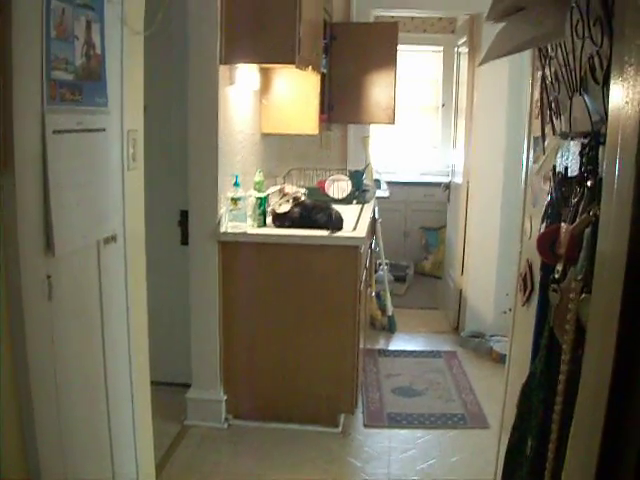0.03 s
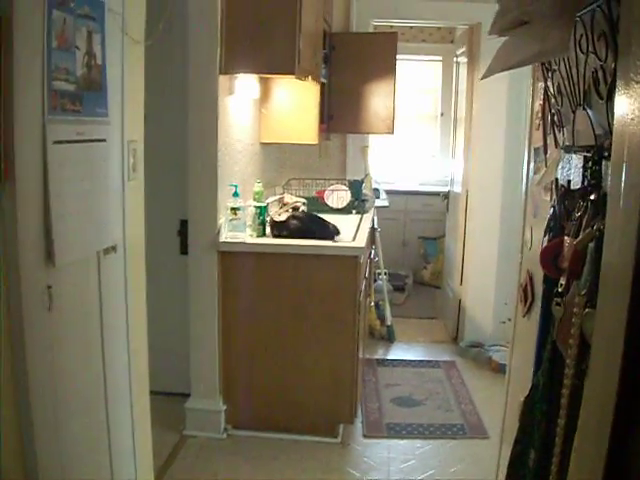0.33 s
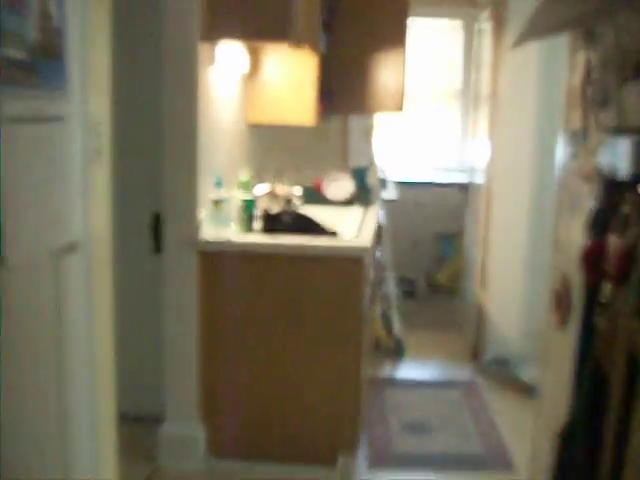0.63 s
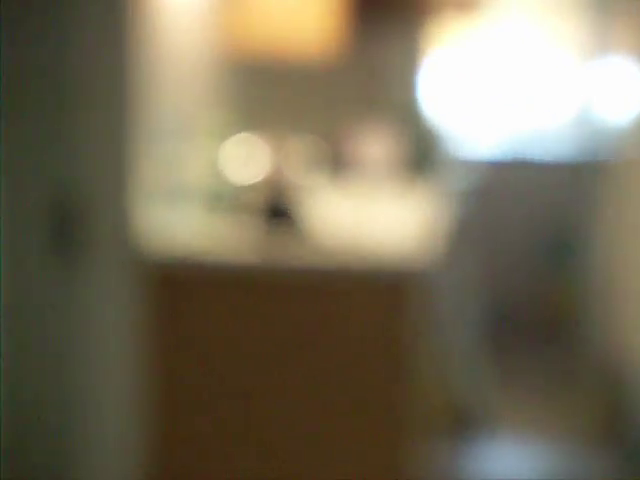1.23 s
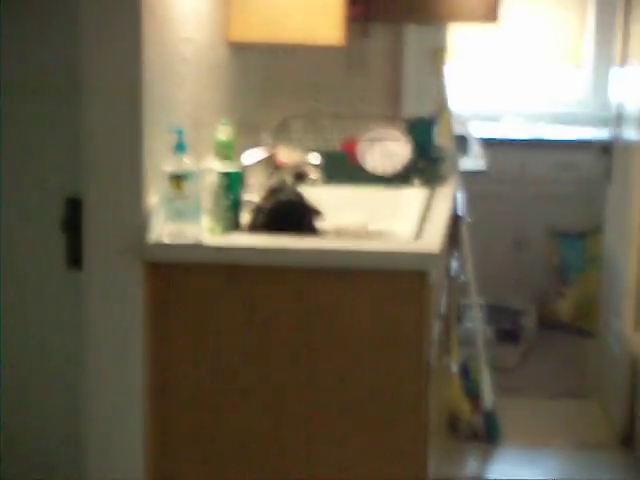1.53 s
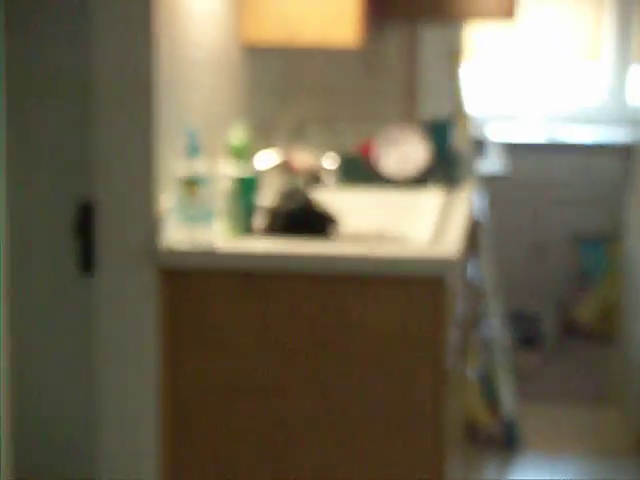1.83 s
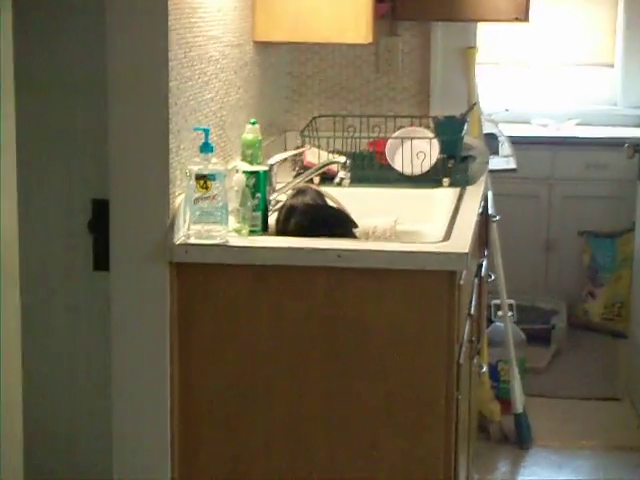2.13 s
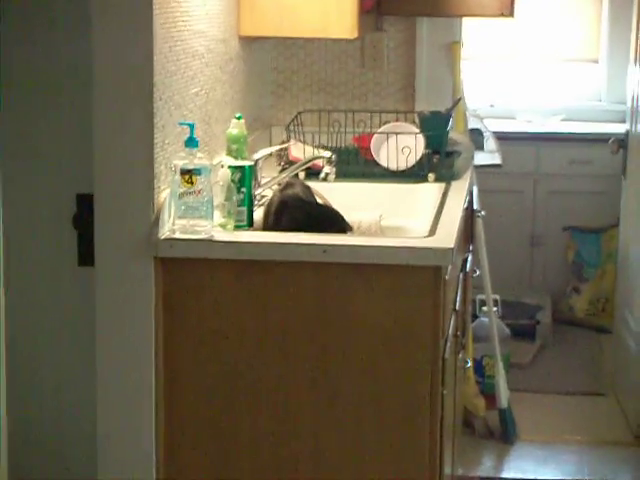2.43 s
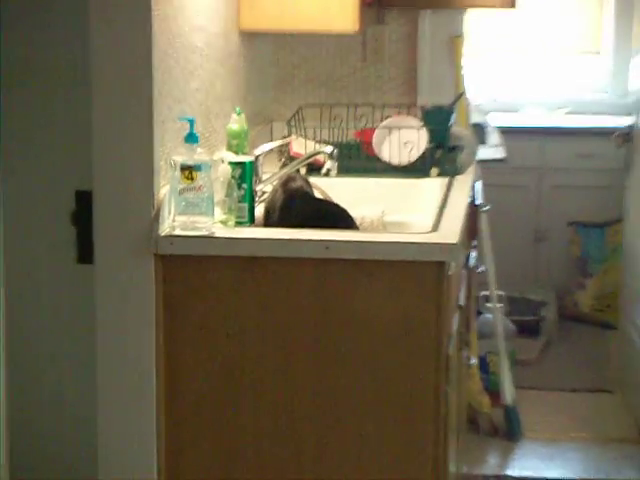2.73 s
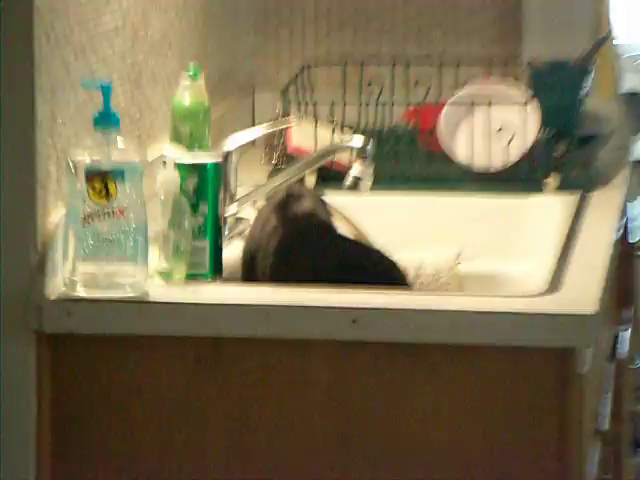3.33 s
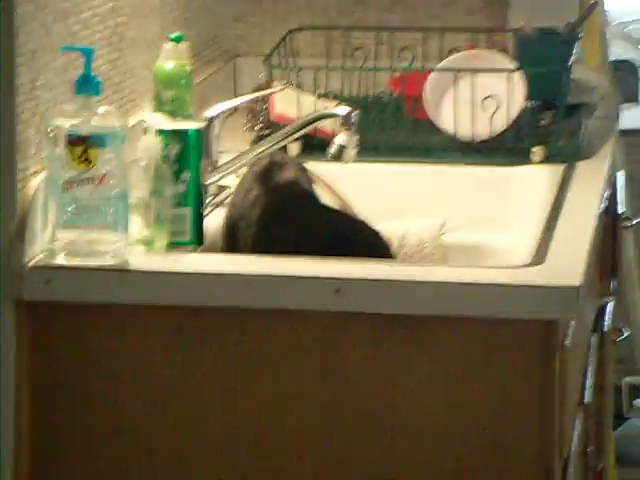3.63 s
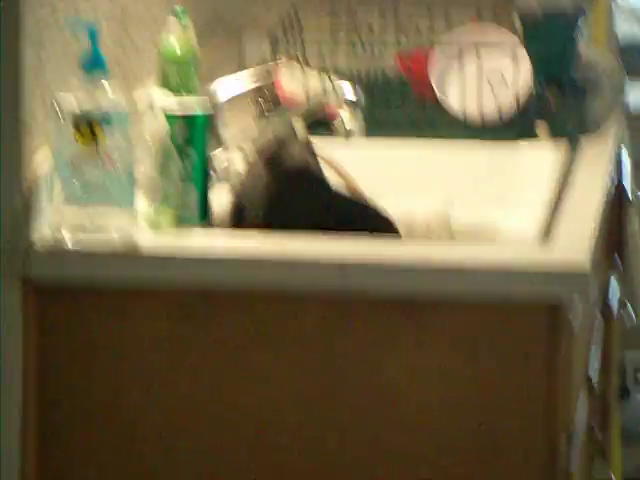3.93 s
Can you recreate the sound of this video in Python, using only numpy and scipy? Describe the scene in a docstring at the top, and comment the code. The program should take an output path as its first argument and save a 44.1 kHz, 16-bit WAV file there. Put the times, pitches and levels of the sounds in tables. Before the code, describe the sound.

A small camera's zoom motor buzzes, heard through its own case in a quiet kitchen. After soft finger rubbing and a click, it runs from 0.5 to 1.9 seconds with rattling, clacking gears, ending in a brief bright focusing rasp. More rubbing leads to a click at 2.6 seconds and a shorter buzz from 2.8 to 3.4. Near 3.9 seconds the lever snaps back sharply with a faint ring.

```python
"""A small camera zooms in twice in a quiet kitchen, heard through its own case.
First a finger rubs on the case and clicks the zoom lever. From 0.5 s a stepping motor buzzes;
its gears rattle once a turn and clack as they take up or stop. Near 1.9 s the lens refocuses
with a bright rasp. The finger rubs and clicks again, and a shorter zoom starts at 2.8 s.
Finally, near 3.9 s, the lever snaps back and its spring rings."""
import sys
import numpy as np
from scipy import signal
from scipy.fft import rfft, irfft
from scipy.io import wavfile

SR = 44100
rng = np.random.default_rng(int(sys.argv[2]) if len(sys.argv) > 2 else 0)


def store_pcm(level_fs):
    """Save levels as 16-bit WAV."""
    pcm = np.round(np.clip(level_fs, -1, 1) * 32767).astype(np.int16)
    wavfile.write(sys.argv[1], SR, np.atleast_2d(pcm).T)


N = 176400

STEP_HZ, STEPS_PER_TURN, TICKS_PER_STEP = 292.95, 10, 4
JITTER_S, CONTACT_S = 0.000022, 0.0008  # random tick timing; build-up of a knock
MIC_EDGE_HZ = 5950

# Levels in the tables are relative, not final loudness.
# Motor runs: start_s, end_s, level_db, swell_db, rattle_db, hum_db, whirr_db
MOTOR_RUNS = [(0.503, 0.653, -3, 5.5, -14.5, -4.5, -8), (0.666, 0.856, -0.5, 3.5, -9.5, -2.5, -12.5),
              (0.868, 1.233, 0, 3, -9.5, -1.5, -6), (1.237, 1.868, -1, 4.5, -9, 0, -3.5),
              (2.817, 2.967, 0, 3.5, -7, -2.5, 1.5), (2.988, 3.2, -1, 3, -4.5, 0, 1),
              (3.21, 3.347, -3.5, 5, -7.5, 1, 0.5)]
# A moment in each run when the gears pass their tight spot: time_s
TIGHT_SPOTS = [.534, .7415, .9825, 1.5305, 2.875, 3.083, 3.26]
# Motor hum: cycles_per_step, level_db
HUM_TONES = [(1, -52), (2, -49.5), (4, -43), (5, -49), (6, -34.5), (8, -38)]
# Gear whine: cycles_per_turn, level_db
WHINE_TONES = [(85, -47), (94, -49.5), (113, -44.5), (122, -36.5), (141, -36.5), (150, -38.5)]
# Whirr of a second motor: pitch_hz, width_hz, level_db
WHIRR_TONES = [(914, 55, -43), (1172, 130, -43.5)]
# Focusing rasp: time_s, level_db
FOCUS_LEVELS = [(1.8792, 6.5), (1.894, 0.5), (1.905, 10.5), (1.96, 5), (1.967, -1), (1.971, 3.5),
                (2.008, 10), (2.031, 7.5), (2.045, 2.5)]
# Gear clacks: start_s, level_db, brightness_db_per_octave
GEAR_CLACKS = [(.655, 9.5, -1), (0.858, 11.5, 1.5), (1.8645, 7, -1.5), (2.97, 11, -2), (2.9806, 7, -0.5),
               (3.204, 9.5, -1), (3.351, 7.5, -1), (3.364, 3.5, -0.5), (3.374, 4.5, 0.5)]
# Lever and case clicks: start_s, level_db, thump_db, brightness_db_per_octave
LEVER_CLICKS = [(.127, -14.5, -16.5, -5), (0.2543, -7, -22.5, -2.5), (0.324, 2, -13.5, 5.5),
                (1.2109, -2, -19, -17), (2.6484, 6.5, -7.5, 5.5), (3.263, -3, -18, -12),
                (3.688, -8.5, -46, 4), (3.8589, 13, -55, 5)]
# Ringing of the lever: pitch_hz, level_db, ring_s (time to fade by 60 dB)
LEVER_TONES = [(1156, -10, 0.015), (1366, 1, 0.0093), (1762, -3.5, 0.005), (2695, -18, 0.013),
               (4280, -17, 0.007)]
# Knocks as the motor jerks into motion or settles: start_s, level_db
START_KNOCKS = [(.4806, 0.5), (0.4907, 0.5), (2.808, -2.5), (3.402, -16.5)]
# Ringing of these knocks: pitch_hz, level_db, ring_s
KNOCK_TONES = [(1330, -9.5, 0.014), (2565, -8, 0.009), (3000, 2, 0.0047), (4276, -9.5, 0.0067)]
# Gears coast, then the lever slides back: start_s, end_s, level_db, brightness_db_per_octave
PLASTIC_SCRAPES = [(3.361, 3.442, -29.5, -13.5), (3.694, 3.76, -19.5, -9.5)]
# How well the case passes each pitch: pitch_hz, level_db
CASE_COLOUR = [(100, -48.5), (600, -24.5), (900, -15), (1300, -7), (1650, -7), (2180, -16.5), (2450, -2),
               (2900, -2.5), (3150, -2), (3380, -2.5), (3560, 1), (3820, -6), (4170, 4.5), (4420, 0),
               (4680, -9.5), (4980, -3.5), (5260, -5), (5500, -13.5)]
# Finger on the case: time_s, rub_db, rumble_db
FINGER_LEVELS = [(0, -36, -29.5), (0.325, -37, -31), (0.339, -74, -43), (0.402, -55, -52.5),
                 (2.132, -57, -66), (2.2, -44, -36), (2.4, -36.5, -30.5), (2.645, -37, -36),
                 (2.669, -55.5, -45), (2.762, -61.5, -56), (3.56, -55.5, -51.5), (3.691, -36.5, -20.5),
                 (3.711, -38, -40), (3.79, -40.5, -33), (3.858, -28.5, -45), (3.872, -53, -37),
                 (3.945, -65, -54), (4, -41, -41)]
# Hiss of rubbing skin: pitch_hz, level_db
RUB_COLOUR = [(100, -31.5), (200, -8), (440, -9), (1150, -8.5), (2400, -13), (5100, -16), (5800, -38.5)]
# Rumble of finger pressure: pitch_hz, level_db
RUMBLE_COLOUR = [(25, 4.5), (70, -9.5), (200, -18.5), (1000, -70.5)]
# Kitchen air: pitch_hz, level_db
ROOM_COLOUR = [(90, -21), (250, -5.5), (5000, -13), (5900, -20)]


def motor(whine_swell_db=9):
    """The motor hums and drives the gears, whose ticks, hiss and whine swell once a turn."""
    t = np.arange(N) / SR
    ticks, hum_gain, whine_gain, hiss_gain, whirr_gain = np.zeros((5, N))
    for run, tight_s in zip(MOTOR_RUNS, TIGHT_SPOTS):
        start, end, db, swell_db, rattle_db, hum_db, whirr_db = run
        ticks += gear_ticks(start, end, tight_s, db, swell_db, rattle_db)
        running = np.clip(np.minimum(t - start, end - t) / 0.00039, 0, 1)  # quick fade in and out
        load = np.cos(2 * np.pi * (t - tight_s) * STEP_HZ / STEPS_PER_TURN)
        hum_gain += running * amp(hum_db)
        whirr_gain += running * amp(whirr_db)
        whine_gain += running * amp(db + whine_swell_db * load)
        hiss_gain += running * amp(db + rattle_db / 2 + swell_db * load)
    hiss = amp(-18) * hiss_gain * rng.standard_normal(N)
    gears = amp(2.01) * through_case(ticks + hiss)
    hum = hum_gain * tones(HUM_TONES, STEP_HZ)
    whine = whine_gain * tones(WHINE_TONES, STEP_HZ / STEPS_PER_TURN)
    return gears + hum + whine + whirr_gain * motor_whirr(t)


def gear_ticks(start, end, tight_s, db, swell_db, rattle_db):
    """Each step kicks the gears; the teeth rattle between steps in a pattern that repeats every turn."""
    per_turn = STEPS_PER_TURN * TICKS_PER_STEP
    tick = np.arange(-441, 882)  # counted from the tight spot
    tooth, on_step = tick % per_turn, tick % TICKS_PER_STEP == 0
    load = np.cos(2 * np.pi * tick / per_turn)
    jitter, flicker = rng.standard_normal((2, len(tick)))
    error_s = TOOTH_TIMING[tooth] * np.where(on_step, 0.00005, 0.00019)
    times = tight_s + tick / (STEP_HZ * TICKS_PER_STEP) + error_s + JITTER_S * jitter
    between_db = rattle_db + 5 * (load - 1) + 0.8 * TOOTH_STRENGTH[tooth]
    level_db = db + swell_db * load + 1.15 * flicker + np.where(on_step, 0, between_db)
    return pulses(times, amp(level_db) * (times > start) * (times < end))


def motor_whirr(t, waver_hz=9.62):
    """Fuzzy tones of a second, smaller motor waver in pitch and level."""
    sway = np.cos(2 * np.pi * waver_hz * (t - 1.8))
    wavering_time = np.cumsum(1 - 0.04 * sway) / SR
    out = np.zeros(N)
    for hz, width_hz, db in WHIRR_TONES:
        fuzz = drift(width_hz) + 1j * drift(width_hz)
        out += amp(db) * (fuzz * np.exp(2j * np.pi * hz * wavering_time)).real
    return amp(4 * sway) * out


def focus_rasp(grind_s=0.0014):
    """The lens refocuses: each step ticks and grinds briefly, making a bright rasp."""
    times, db = np.transpose(FOCUS_LEVELS)
    step_times = np.arange(times[0], times[-1], 1 / STEP_HZ)
    jitter, flicker = rng.standard_normal((2, len(step_times)))
    steps = pulses(step_times + JITTER_S * jitter, amp(np.interp(step_times, times, db) + flicker))
    tails = signal.lfilter([1], [1, -np.exp(-1 / (grind_s * SR))], steps)
    grind = amp(-15.5) * tails * rng.standard_normal(N)
    return through_case(steps + grind, bright_db=2.5)


def gear_clacks(chatter_s=0.003, low_cut_hz=785):
    """The gears knock and chatter briefly when they take up, skip or stop."""
    out, t = np.zeros(N), np.arange(2048) / SR
    for start, db, bright_db in GEAR_CLACKS:
        chatter = amp(-14) * np.exp(-t / chatter_s) * rng.standard_normal(len(t))
        blow = (t == 0) + chatter
        add(out, start, amp(db) * through_case(blow, bright_db, spread_s=0.0007))
    return signal.sosfilt(signal.butter(2, low_cut_hz, "highpass", fs=SR, output="sos"), out)


def lever_clicks(push_s=0.0009, release_s=0.011):
    """Each click rings the lever and thumps the case with a push, then a release."""
    out, t = np.zeros(N), np.arange(8192) / SR
    since = t - t.mean()  # time from the thump's peak
    push, release = np.exp(-abs(since) / push_s), np.exp(-abs(since) / release_s)
    thump = push + 0.21 * (since > 0) * (push - release)
    main_hz = LEVER_TONES[1][0]
    for start, db, thump_db, bright_db in LEVER_CLICKS:
        held = 0.72 if start < LEVER_CLICKS[-1][0] else 1  # the finger shortens all but the last ring
        ringing = sum(ring(t, hz, tone_db + bright_db * np.log2(hz / main_hz), held * ring_s)
                      for hz, tone_db, ring_s in LEVER_TONES)
        add(out, start, amp(db) * (1 - np.exp(-t / CONTACT_S)) * ringing)
        add(out, start - t.mean(), amp(thump_db) * thump)
    return out


def lever_spring():
    """The spring rings on after the lever snaps back."""
    out, t = np.zeros(N), np.arange(8192) / SR
    add(out, 3.859, ring(t, hz=1443, db=-30, ring_s=0.17))
    return out


def start_knocks():
    """A short bright knock rings briefly as the motor jerks into motion or settles."""
    out, t = np.zeros(N), np.arange(2048) / SR
    ringing = sum(ring(t, hz, db, ring_s) for hz, db, ring_s in KNOCK_TONES)
    for start, db in START_KNOCKS:
        add(out, start, amp(db) * (1 - np.exp(-t / CONTACT_S)) * ringing)
    return out


def scrapes():
    """Plastic slides on plastic and sounds through the case."""
    out = np.zeros(N)
    for start, end, db, bright_db in PLASTIC_SCRAPES:
        grit = rng.standard_normal(N)[:round((end - start) * SR)]
        add(out, start, amp(db) * through_case(grit * signal.windows.tukey(len(grit)), bright_db))
    return out


def finger():
    """Skin slides over the case with a grainy hiss and a low rumble."""
    times, rub_db, rumble_db = np.transpose(FINGER_LEVELS)
    t = np.arange(N) / SR
    rub = noise(RUB_COLOUR) * amp(np.interp(t, times, rub_db) + 1.5 * drift(120))
    rumble = noise(RUMBLE_COLOUR) * amp(np.interp(t, times, rumble_db))
    return rub + rumble


def kitchen_air():
    """The room adds a faint, steady hiss."""
    return amp(-56) * noise(ROOM_COLOUR)


def through_case(x, bright_db=0, spread_s=0.00198, size=2048):
    """The plastic case colours a sound and passes its treble slightly sooner than its bass."""
    hz = abs(np.fft.fftfreq(size, 1 / SR))
    octaves = np.log2(np.clip(hz, 1000, 6000) / 3000)
    log_gain = np.log(amp(level_at(CASE_COLOUR, hz) + bright_db * octaves))
    delay_s = spread_s * np.maximum(1 - hz / MIC_EDGE_HZ, 0)
    phase_lag = 2 * np.pi * np.cumsum(delay_s) * SR / size
    response = np.exp(np.conj(signal.hilbert(log_gain)) - 1j * phase_lag)[:size // 2 + 1]
    return signal.oaconvolve(x, irfft(response)[:size // 2])[:len(x)]


def tones(table, base_hz):
    """Overtones of a base pitch, each wavering a little in level."""
    t = np.arange(N) / SR
    return sum(amp(db + 1.14 * drift(12)) * np.sin(2 * np.pi * (multiple * base_hz * t + rng.random()))
               for multiple, db in table)


def ring(t, hz, db, ring_s):
    """A tone that fades by 60 dB in ring_s."""
    return amp(db - 60 * t / ring_s) * np.sin(2 * np.pi * hz * t)


def pulses(times, sizes):
    """Sharp pulses at exact times, even between samples."""
    out, place = np.zeros(N), times[:, None] * SR
    near = place.astype(int) + np.arange(-8, 9)
    np.add.at(out, np.clip(near, 0, N - 1), sizes[:, None] * np.sinc(near - place))
    return out


def noise(colour):
    """Steady noise with a given colour."""
    return shaped_noise(amp(level_at(colour, np.fft.rfftfreq(N, 1 / SR))))


def drift(hz):
    """Random wandering, up to about this rate."""
    return shaped_noise(np.exp(-(np.fft.rfftfreq(N, 1 / SR) / hz) ** 2))


def shaped_noise(gains):
    """Noise with a gain for each pitch, scaled to an average power of 1."""
    x = irfft(rfft(rng.standard_normal(N)) * gains, N)
    return x / np.sqrt(np.mean(x ** 2) + 1e-20)


def level_at(colour, hz):
    """Reads a colour table's level at any pitch."""
    pitches, db = np.transpose(colour)
    return np.interp(np.log(hz + 1), np.log(pitches + 1), db)


def lowpass(x, hz):
    """Cuts the treble steeply above hz."""
    return signal.oaconvolve(x, signal.firwin(255, hz, window=("kaiser", 8), fs=SR), "same")


def amp(db):
    """Decibels to gain."""
    return 10 ** (np.asarray(db) / 20)


def add(mix, start_s, sound):
    """Mixes a sound in at a time."""
    part = mix[max(round(start_s * SR), 0):][:len(sound)]
    part += sound[:len(part)]


def scene():
    """The camera's own noises over the faint air of the kitchen."""
    lens = motor() + focus_rasp() + gear_clacks() + start_knocks()
    return (lens + lever_clicks() + lever_spring() + scrapes() + finger() + kitchen_air())[None]


def record(dry):
    """The microphone loses high treble and overloads on the hardest clicks; the result is softened."""
    clipped = np.clip(lowpass(dry[0], MIC_EDGE_HZ), -0.72, 0.72)
    soft = signal.sosfilt(signal.butter(2, 7500, fs=SR, output="sos"), clipped)
    return lowpass(soft, 16000)[None]


# Each gear tooth has its own small error in timing and strength.
TOOTH_TIMING, TOOTH_STRENGTH = rng.standard_normal((2, STEPS_PER_TURN * TICKS_PER_STEP))

dry = scene()
out = record(dry)
store_pcm(out)
```